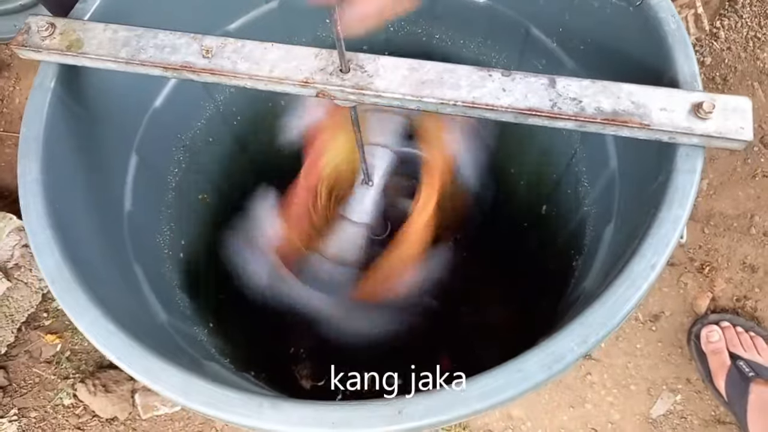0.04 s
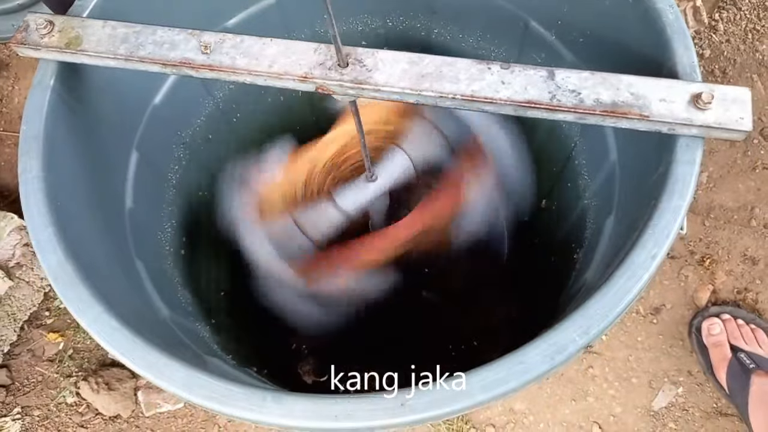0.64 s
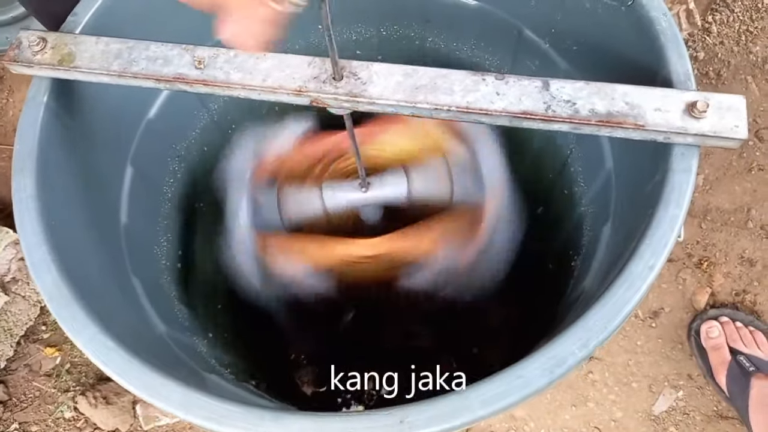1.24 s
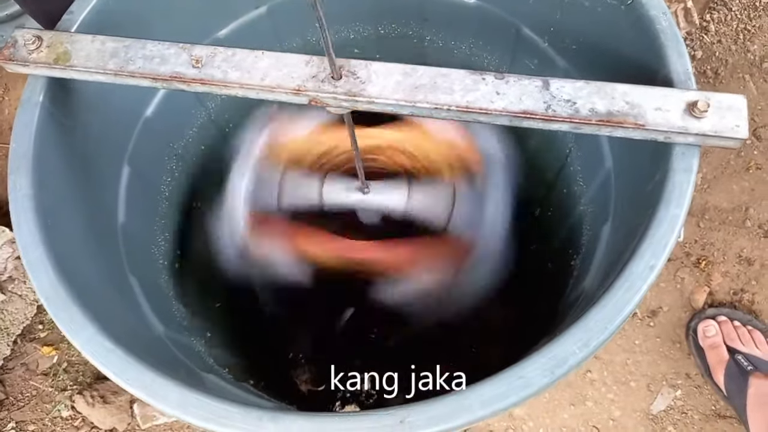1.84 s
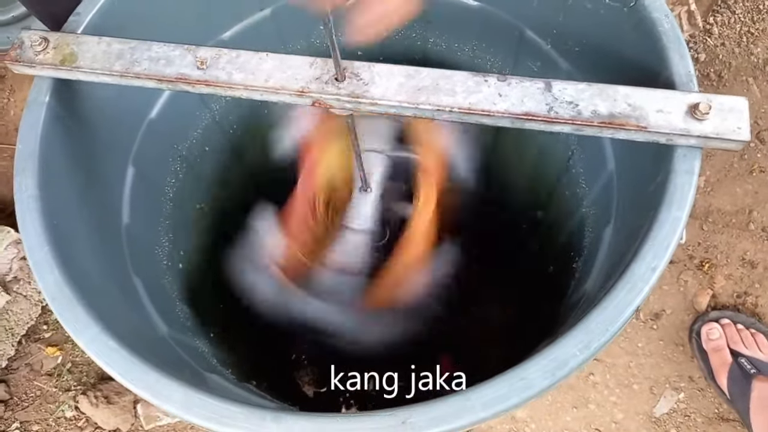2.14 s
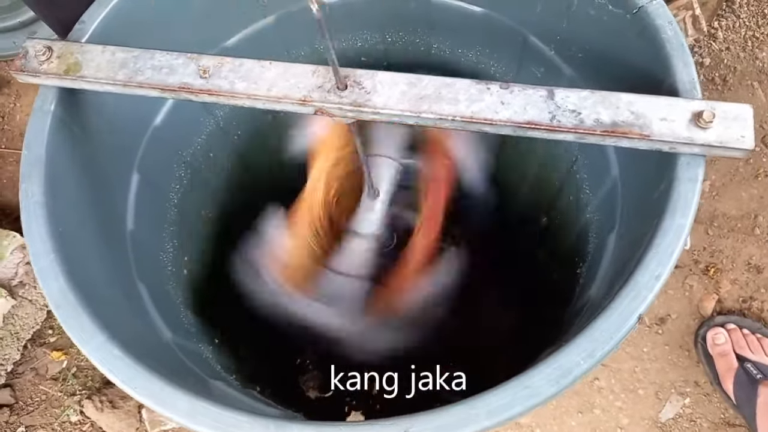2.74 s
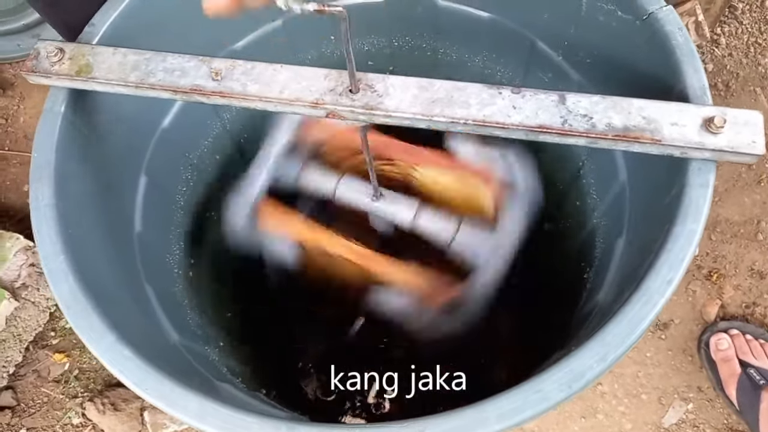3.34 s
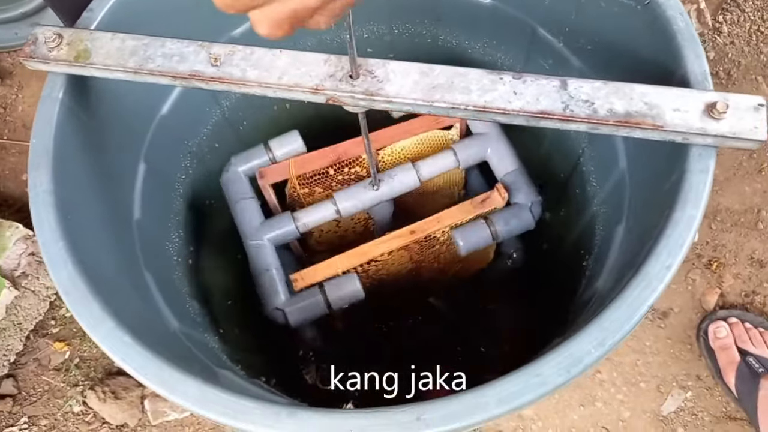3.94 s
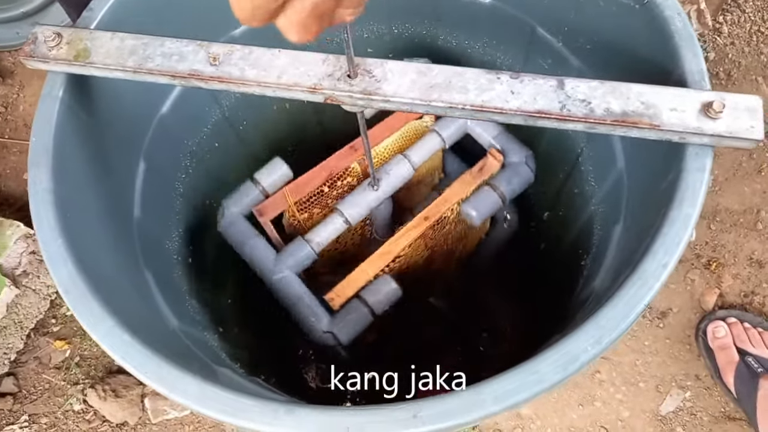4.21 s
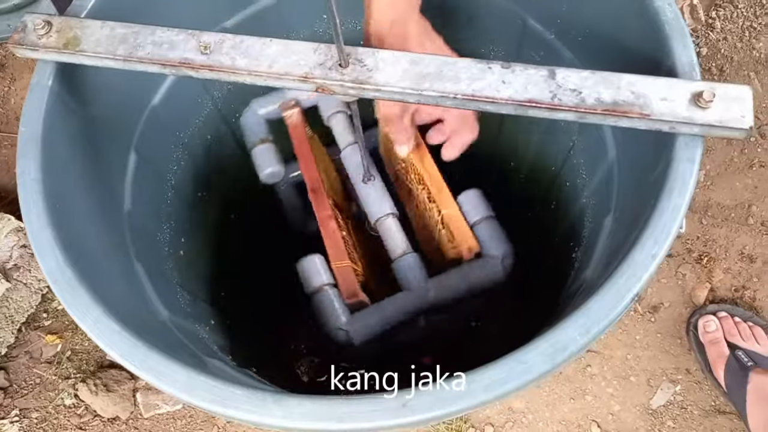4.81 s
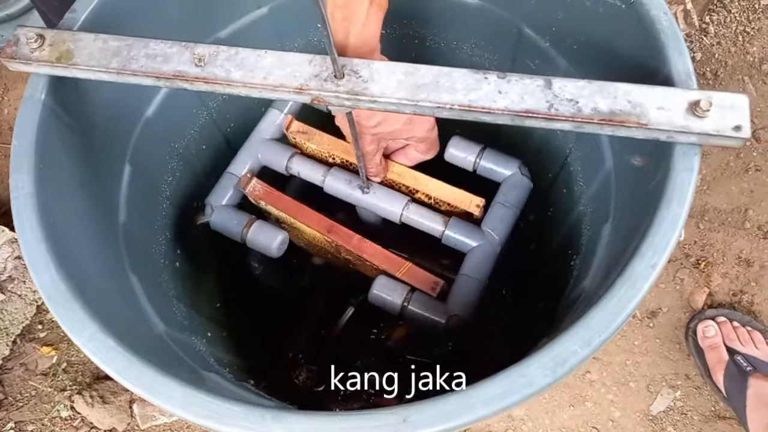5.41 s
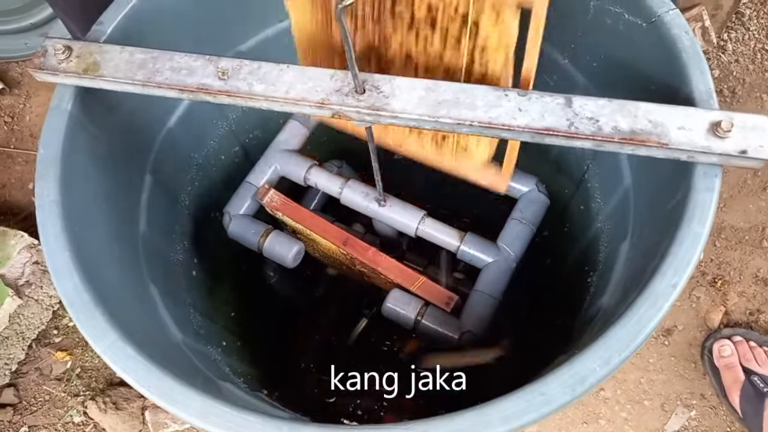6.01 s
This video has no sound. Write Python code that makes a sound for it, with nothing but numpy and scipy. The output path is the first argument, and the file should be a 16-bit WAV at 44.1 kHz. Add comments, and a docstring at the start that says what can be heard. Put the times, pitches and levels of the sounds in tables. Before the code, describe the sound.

A hand-spun honey extractor is heard outdoors, from just above the rim of its plastic bucket. From the start until about 3 seconds, a steel rod grinds roughly in its bearings and clanks irregularly against a metal crossbar. Wooden frames clack and knock in their holders, the unbalanced cage makes the bucket boom, and honey drops patter faintly on the wall. Stronger clanks come around 1.5 and 1.9 seconds, a tiny high squeal at 2.3, and the hardest, ringing clank at 2.9. The cage then coasts, its grinding fading away by about 4.5 seconds amid lighter knocks, ticks and rubs, while a soft outdoor hiss comes up. After a sharp tick, a hand stops the cage at 4.8 seconds with a hollow thump and a small crack. From 5 to nearly 6 seconds, a wooden frame slides out in short, quiet, grainy scrapes.

```python
"""Outdoors, a hand-spun honey extractor: a pipe cage with two comb frames turns on a steel rod in a
plastic bucket. The rod grinds in its bearings and clanks in the metal crossbar, the unbalanced cage
makes the bucket boom, the frames rattle and honey patters on the wall.
The cage coasts down; a hand stops it with a thump and slides a wooden frame out."""
import sys
import numpy as np
from scipy import signal
from scipy.fft import rfft, irfft, next_fast_len
from scipy.io import wavfile
from scipy.ndimage import uniform_filter1d, map_coordinates

SR = 44100
rng = np.random.default_rng(int(sys.argv[2]) if len(sys.argv) > 2 else 0)


def wav_record(signal):
    """Record a signal, one row per channel, as 16-bit PCM in the file named by sys.argv[1]."""
    frames = np.transpose(np.atleast_2d(signal))
    bounded = np.clip(frames, -1, 1)
    # unit amplitude maps onto the largest positive 16-bit level
    quanta = np.round(bounded * 32767).astype(np.int16)
    wavfile.write(sys.argv[1], SR, quanta)


N = 271640
SCENE_T = np.arange(N) / SR
RING_T = np.arange(int(.45 * SR)) / SR  # time axis of one impact
LET_GO_S = 2.9  # the cage coasts from here


def amp(db):
    """Decibels to gain."""
    return 10 ** (np.asarray(db) / 20)

def unit(x):
    """x at rms 1."""
    return x / np.sqrt(np.mean(x ** 2) + 1e-20)

def crest(x):
    """x with its loudest 5 ms at rms 1."""
    return x / np.sqrt(uniform_filter1d(np.mean(x ** 2, 0), 220).max() + 1e-20)

def along(points, hz):
    """Interpolate (f/Hz, value) points on a log axis."""
    freqs, values = np.transpose(points)
    return np.interp(np.log(hz + 1), np.log(freqs + 1), values)

def curves(rows):
    """One value per sample for each column after the time."""
    times, *columns = np.transpose(rows)
    return [np.interp(SCENE_T, times, column) for column in columns]

def wobble(rate_hz):
    """Smooth random curve."""
    knots = rng.standard_normal(int(N * rate_hz / SR) + 4)
    return map_coordinates(knots, [SCENE_T * rate_hz])

def add(track, at_s, sound):
    """Mix a sound into a stereo track."""
    start = int(np.clip(round(at_s * SR), 0, N - 1))
    track[:, start:start + sound.shape[1]] += sound[:, :N - start]

def burst(t60):
    """Scattered reflections of one contact, dying away."""
    return rng.standard_normal((2, len(RING_T))) * amp(-60 * RING_T / t60)

def onset(rise_s):
    """Exponential attack of an impact."""
    return 1 - np.exp(-RING_T / rise_s)

def slips(per_s, spread_db, smooth):
    """Irregular stick-slip jolts of uneven size over a share of smooth friction."""
    jolts = (rng.random(N) < per_s / SR) * amp(spread_db * rng.standard_normal(N))
    return unit(jolts * rng.choice([-1, 1], (2, N))) + smooth * rng.standard_normal((2, N))

def ringing(modes, db_per_octave):
    """Struck metal: decaying modes of scattered strength and phase."""
    hz, mode_db, t60 = np.transpose(modes)
    strengths = amp(mode_db + rng.normal(0, 2, len(hz)) + db_per_octave * np.log2(hz / 8000))
    phases = 2 * np.pi * rng.random(len(hz)) + rng.normal(0, 1.0, (2, len(hz)))
    waves = np.exp((2j * np.pi * hz - np.log(1000) / t60)[:, None] * RING_T)
    return ((strengths * np.exp(1j * phases)) @ waves).imag

# bucket resonances: f/Hz, width/Hz, lift/dB
BUCKET_MODES = [(139.7, 34, 16.5), (230.7, 28.6, 8.5), (296.8, 69, 7.5), (347.5, 30, 6), (431.7, 18, 8),
                (494, 97, 6), (640, 76, 11.5), (816.4, 66, 11), (1128, 85, 7)]
# left-right likeness: f/Hz, correlation
COHERENCE = [(60, .96), (130, .99), (290, .94), (640, .66), (1410, .25), (3100, .05), (7000, .05)]
def colour(pair, spectrum, bucket=0., peaks=()):
    """Two unrelated signals to stereo, through a spectrum, a share of the bucket's modes and peaks."""
    n = pair.shape[1]
    size = 2 * next_fast_len(n // 2 + 4096)
    hz = np.fft.rfftfreq(size, 1 / SR)
    def lift_db(rows):
        return sum(db / (1 + (2 * (hz - centre) / width) ** 2) for centre, width, db in rows)
    gain = amp(along(spectrum, hz) + bucket * lift_db(BUCKET_MODES) + lift_db(peaks))
    cepstrum = irfft(np.log(gain))
    cepstrum[1:size // 2] *= 2  # fold to minimum phase
    cepstrum[size // 2 + 1:] = 0
    filtered = rfft(pair, size) * np.exp(rfft(cepstrum))
    angle = np.arccos(np.clip(along(COHERENCE, hz), -1, 1)) / 2
    mid, side = irfft(filtered * [np.cos(angle), np.sin(angle)])[:, :n]
    return np.array([mid + side, mid - side])

def boom(hz, rise_s, t60):
    """The bucket's lowest mode, alike on both sides."""
    swell = 1 - np.exp(-(RING_T / rise_s) ** 2)
    mode = amp(-60 * RING_T / t60) * np.sin(2 * np.pi * hz * RING_T)
    return crest(np.tile(swell * mode, (2, 1)))


# recorder's automatic gain recovering, as a set curve on the hiss: t/s, level/dB
GAIN_RECOVERY = [(2.9, -57.5), (3.9, -53.5), (4.3, -52), (4.65, -48.5), (5.55, -48), (6.16, -50)]
# spectra of the hiss and the open bucket: f/Hz, level/dB
HISS_SPECTRUM = [(20, -30), (40, -23), (72, -3), (135, -7.5), (175, -10), (260, -10), (450, -13),
                 (800, -15), (1500, -15), (2900, -17.5), (3900, -24), (7000, -28.5), (12000, -33),
                 (16000, -35.5)]
HOLLOW_SPECTRUM = [(25, -27), (50, -19), (72, 1), (110, -3.5), (300, -53)]
def outdoors():
    """Steady outdoor hiss, louder as the recorder's gain recovers after the clatter; a low hollow."""
    recovery_db, = curves(GAIN_RECOVERY)
    hiss = unit(colour(slips(per_s=350, spread_db=8.5, smooth=3.8), HISS_SPECTRUM, bucket=.11))
    drift_db = .5 * wobble(9)
    bucket_hollow = unit(colour(rng.standard_normal((2, N)), HOLLOW_SPECTRUM))
    return amp(recovery_db + 12.5 + drift_db) * hiss + amp(-45) * bucket_hollow

# wood rubbing on pipe: t/s, length/s, centre/Hz, level/dB
STROKES = [(3.806, 0.026, 315, -32), (3.819, 0.054, 233, -32.5), (4.166, 0.1, 317, -40),
           (4.479, 0.072, 530, -37.5), (4.575, 0.066, 1900, -39.5), (4.95, 0.15, 1800, -40.5),
           (5.199, 0.045, 735, -37), (5.229, 0.043, 1610, -34), (5.4, 0.035, 2930, -37),
           (5.407, 0.076, 1510, -39.5), (5.543, 0.11, 170, -36), (5.716, 0.058, 159, -33),
           (5.577, 0.04, 865, -34), (5.74, 0.061, 1700, -40)]
def slides():
    """The frame rubs along its holders in short grainy strokes."""
    out = np.zeros((2, N))
    friction = slips(per_s=420, spread_db=3, smooth=.2)
    for at_s, length_s, hz, db in STROKES:
        stroke = friction[:, int(at_s * SR):int((at_s + length_s) * SR)]
        spectrum = [(hz / 8, -35), (hz / 2, -8), (hz, 0), (hz * 2, -14), (hz * 8, -42)]
        rub = unit(colour(stroke, spectrum, bucket=.26))
        swell = np.sin(np.pi * np.linspace(0, 1, rub.shape[1]) ** .74)
        add(out, at_s, amp(db) * rub * swell)
    return out

# light touches: t/s, level/dB, centre/Hz
TOUCHES = [(2.9906, -24.5, 11600), (3.101, -37, 9000), (3.512, -34, 9000), (3.798, -33, 8800),
           (4.4448, -41, 12000), (4.6933, -20.5, 12200), (4.9781, -35, 9000), (5.1262, -36, 14500),
           (5.4035, -34, 8000)]
# tick spectrum: f/Hz, level/dB
TICK_SPECTRUM = [(600, -18), (2000, -5), (6000, -3.5), (9500, -1.5), (11700, -3), (13500, -6), (16000, -13)]
def ticks():
    """Frames and cage touch lightly: small sharp ticks."""
    out = np.zeros((2, N))
    for at_s, db, hz in TOUCHES:
        contact = burst(.0056) + .44 * burst(.12)
        tick = colour(contact, TICK_SPECTRUM, peaks=[(hz, 1200, 9.5)])
        add(out, at_s, amp(db - 6.5) * crest(tick))
    return out

def patter(per_s):
    """Flung honey drops tap the wall, each at its own pitch; higher taps die sooner."""
    out = np.zeros((2, N))
    t = RING_T[:int(.04 * SR)]
    for when, pitch, size in rng.random((int(per_s * N / SR), 3)):
        hz = 750 * (3500 / 750) ** pitch
        t60 = 26 / hz
        phase = 2 * np.pi * rng.random() + rng.normal(0, .43, (2, 1))
        envelope = amp(-60 * t / t60) * (1 - np.exp(-t / .0016))
        tap = envelope * np.sin(2 * np.pi * hz * t + phase)
        add(out, when * N / SR, amp(19 * size - 1.5 * pitch) * tap)
    return unit(out)

# frames striking their holders: t/s, level/dB, centre/Hz
FRAME_CLACKS = [(0.088, -14, 950), (0.11, -19, 2850), (0.2105, -13.5, 890), (0.216, -19, 2700),
                (0.262, -17, 1000), (0.286, -20, 900), (0.318, -18.5, 2400), (0.435, -19.5, 820),
                (0.473, -23, 900), (0.573, -19, 860), (0.6715, -13.5, 1490), (0.698, -20, 770),
                (0.775, -23, 1100), (0.803, -14, 1400), (0.81, -18, 950), (0.835, -21, 900),
                (0.899, -17.5, 800), (1.005, -18, 840), (1.06, -15.5, 945), (1.127, -19.5, 850),
                (1.181, -22, 800), (1.2234, -16.5, 950), (1.265, -28, 850), (1.298, -19, 1100),
                (1.35, -19, 800), (1.375, -23, 2900), (1.474, -12.5, 766), (1.495, -10, 780),
                (1.546, -22, 900), (1.591, -19, 1300), (1.623, -15.5, 800), (1.712, -18.5, 836),
                (1.852, -15, 830), (1.943, -18, 2220), (1.965, -15, 900), (2.088, -22, 1700),
                (2.158, -22, 800), (2.244, -16, 905), (2.324, -16, 3150), (2.329, -13, 890),
                (2.388, -17.5, 810), (2.448, -19, 2700), (2.478, -21, 2130), (2.522, -18, 2900),
                (2.574, -14.5, 725), (2.656, -15.5, 825), (2.68, -16.5, 850), (2.7326, -16, 2000),
                (2.757, -23, 900), (2.815, -19, 1900), (2.9, -10.5, 820), (2.992, -12.5, 1200),
                (3.0, -22, 800), (3.512, -23, 900), (3.5131, -23, 2330), (3.7961, -21, 2260),
                (5.21, -28, 700), (5.405, -28, 3200)]
# wood on plastic: f/Hz, level/dB
CLACK_SPECTRUM = [(300, -7.5), (750, -0.5), (1500, -3.5), (2900, -3), (4200, -14.5), (8000, -19),
                  (16000, -27)]
def rattles(strays_per_s=4):
    """Wood taps plastic as the cage sways: dry clacks ring the bucket, with light strays between."""
    out = np.zeros((2, N))
    strays = []
    for when, force in rng.random((int(strays_per_s * LET_GO_S), 2)):
        hz = 1300 * np.exp(.5 * rng.standard_normal())
        strays.append((LET_GO_S * when, -27 + 5 * force, hz))
    for at_s, db, hz in FRAME_CLACKS + strays:
        contact = burst(.075) + 1.8 * burst(.014)
        clack = colour(contact, CLACK_SPECTRUM, bucket=.99, peaks=[(hz, .42 * hz, 11)])
        add(out, at_s, amp(db - 4.5) * crest(clack))
    return out

# frames against cage: t/s, body/dB, thud/dB, click/dB
FRAME_KNOCKS = [(0.222, -23, -29, -26), (0.323, -11.5, -31, -36), (0.368, -11.5, -28, -48),
                (0.552, -13, -26, -25), (0.771, -14.5, -17, -35), (1.078, -27, -34, -36),
                (1.192, -13, -33, -42), (1.301, -15.5, -31, -48), (1.409, -14, -40, -35),
                (1.541, -15, -39, -48), (1.618, -23, -34, -38), (1.858, -14.5, -19, -21),
                (1.971, -11.5, -22, -31), (2.127, -15, -34, -34), (2.186, -21, -21, -46),
                (2.283, -20, -25, -46), (2.485, -10.5, -32, -44), (2.574, -15, -17, -46),
                (2.845, -13, -25, -44), (2.901, -16, -22.5, -24), (2.993, -24, -40, -38),
                (3.095, -24.5, -47, -51), (3.149, -23, -55, -57), (3.268, -22, -40, -58),
                (3.307, -23, -31, -48), (3.512, -26.5, -42, -49), (3.592, -30.5, -45, -63),
                (3.8, -26, -41, -38), (3.998, -30, -41, -39), (4.705, -25, -29, -49)]
# hollow wooden body: f/Hz, level/dB
WOOD_SPECTRUM = [(90, -27), (200, -3), (330, 3), (520, -2), (900, -18), (2000, -17), (6000, -40.5)]
def knocks():
    """A frame knocks the cage: a hollow body, the bucket's thud and a dry click."""
    out = np.zeros((2, N))
    for at_s, body_db, thud_db, click_db in FRAME_KNOCKS:
        body = colour(burst(.12) * onset(.001), WOOD_SPECTRUM, bucket=.7)
        add(out, at_s, amp(body_db - 3) * crest(body))
        add(out, at_s, amp(thud_db) * boom(hz=133.3, rise_s=.012, t60=.3))
        add(out, at_s, amp(click_db) * crest(colour(burst(.2), CLACK_SPECTRUM)))
    return out

# cage and bucket under the hand: f/Hz, level/dB, t60/s
THUMP_MODES = [(136, 0.5, 0.29), (239, -10.5, 0.13), (332, -8, 0.13), (418, -4.5, 0.072),
               (502, -11.5, 0.12), (644, -12, 0.088)]
# hand on cage: t/s, thump/dB, crack/dB
HAND_STOP = (4.8405, -12, -23.5)
def hand_stop(palm_rise_s=.0055):
    """A soft palm stops the cage: the bucket thumps and the frames crack against their holders."""
    out = np.zeros((2, N))
    at_s, thump_db, crack_db = HAND_STOP
    modes = sum(amp(db - 60 * RING_T / t60) * np.sin(2 * np.pi * (hz * RING_T + rng.random()))
                for hz, db, t60 in THUMP_MODES)
    thump = modes * (1 - np.exp(-(RING_T / palm_rise_s) ** 2))
    add(out, at_s, amp(thump_db) * crest(np.tile(thump, (2, 1))))
    contact = burst(.19) + .93 * burst(.015)
    crack = colour(contact, CLACK_SPECTRUM, bucket=.54, peaks=[(2840, 900, 5)])
    add(out, at_s, amp(crack_db) * crest(crack))
    return out

# dry rod's squeal: t/s, f/Hz, level/dB
SQUEAL_GLIDE = [(2.322, 8000, -68), (2.328, 7730, -25), (2.345, 7360, -30), (2.36, 7200, -38),
                (2.405, 7140, -43), (2.44, 7130, -66)]
def squeal():
    """A rough stick-slip whistle sinks onto a mode of the rod."""
    hz, db = curves(SQUEAL_GLIDE)
    phase = 2 * np.pi * np.cumsum(hz * (1 + .038 * wobble(1100))) / SR
    sounding = (SCENE_T > SQUEAL_GLIDE[0][0]) & (SCENE_T < SQUEAL_GLIDE[-1][0])
    return sounding * amp(db + 4.1 * wobble(200)) * np.sin(phase + rng.normal(0, .73, (2, 1)))

# crossbar modes: f/Hz, level/dB, t60/s
BAR_MODES = [(2046, -11, .08), (2353, 0, .125), (2450, -11, .09), (2870, -16, .07), (3838, -17, .11),
             (4355, -23, .14)]
# rod dragging on crossbar: t/s, length/s, level/dB
ROD_DRAGS = [(0.22, 0.054, -33), (1.613, 0.1, -30), (1.85, .05, -36), (1.9, .09, -34), (2.66, 0.04, -35)]
def drags():
    """The dragging rod bows the crossbar: friction swells and fades in its modes."""
    out = np.zeros((2, N))
    for at_s, length_s, db in ROD_DRAGS:
        n = int(length_s * SR)
        friction = rng.standard_normal((1, n)) * np.hanning(n)
        bowed = signal.fftconvolve(friction, ringing(BAR_MODES, db_per_octave=4), axes=1)
        add(out, at_s - .015, amp(db) * crest(bowed))
    return out

# steel rod modes: f/Hz, level/dB, t60/s
ROD_MODES = [(5308, -15, .12), (5900, -10, .1), (6700, -9, .08), (6788, -9, .13), (7138, -11, .15),
             (7450, -8, .07), (7770, -9, .1), (9120, -10, .08), (10110, -8, .08), (10520, -7, .08),
             (11070, -11, .075), (11332, -7, .08), (12165, 1, .07), (13000, -11, .06)]
# bands that rod and bar radiate well or poorly: f/Hz, width/Hz, lift/dB
METAL_BANDS = [(1450, 400, -5), (2900, 250, 1), (5550, 300, -3), (6280, 250, -3), (6760, 300, 3.5),
               (8220, 330, -11), (10400, 400, 3), (10850, 200, -4), (12160, 200, 4), (13100, 500, 3),
               (14000, 400, -5), (15100, 1000, 5)]
# metal on metal: f/Hz, level/dB
CRACK_SPECTRUM = [(600, -23), (2000, -0.5), (3200, -1), (5200, -1.5), (7000, 0.5), (8300, 4), (10000, 2.5),
                  (12500, 3), (16000, -8)]
# rod striking crossbar: t/s, level/dB, bar ring/dB
ROD_BLOWS = [(0.079, -23, -38), (0.101, -18, -22), (0.1595, -24, -42), (0.208, -17.5, -22),
             (0.3006, -18, -35), (0.3294, -17, -26), (0.4579, -24.5, -36), (0.5684, -18, -36),
             (0.6714, -27, -34), (0.7865, -33, -31), (0.941, -20, -39), (1.0053, -18, -41),
             (1.0245, -19.5, -28), (1.151, -19, -30), (1.179, -23, -36), (1.2401, -24.5, -38),
             (1.4708, -8, -15.5), (1.4924, -12, -17), (1.617, -17.5, -20.5), (1.7, -22, -34),
             (1.7303, -13.5, -23), (1.8474, -13, -28), (1.854, -10.5, -19), (1.9597, -14, -18.5),
             (2.093, -25, -26), (2.2366, -27, -33), (2.324, -12.5, -36), (2.4274, -20.5, -33),
             (2.5702, -13, -35), (2.654, -13, -19), (2.677, -12, -20), (2.8852, -19, -35),
             (2.8882, -4, -32), (2.8973, -11, -22), (2.905, -20, -6.5)]
def clanks(rebounds_per_s=700):
    """The rod hits the crossbar and rebounds; harder blows chatter longer, brighter, and ring more."""
    out = np.zeros((2, N))
    n = len(RING_T)
    for at_s, db, bar_db in ROD_BLOWS:
        force_db = db + 9
        chatter_s = .0081 * amp(.16 * force_db)
        db_per_octave = .5 * force_db
        spectrum = [(hz, level + db_per_octave * np.log2(hz / 8000)) for hz, level in CRACK_SPECTRUM]
        rebounds = (rng.random(n) < rebounds_per_s / SR) * rng.normal(0, .7, n)
        rebounds *= np.exp(-RING_T / chatter_s)
        rebounds[0] = 1  # the blow itself
        direct = 10 * burst(.0007)
        reflections = burst(.12) + .62 * burst(.014)
        contact = colour(direct + reflections, spectrum, peaks=METAL_BANDS)
        crack = crest(signal.fftconvolve(contact, rebounds[None], axes=1)[:, :n])
        rod = amp(-9 + .4 * force_db) * crest(ringing(ROD_MODES, db_per_octave) * onset(.0015))
        add(out, at_s, amp(db - 5.5 + .044 * force_db) * (crack + rod))
        bar = crest(ringing(BAR_MODES, db_per_octave=0) * onset(.003))
        add(out, at_s, amp(bar_db - 8) * bar)
    return out

# scraping grains: f/Hz, level/dB
GRIT_SPECTRUM = [(300, -12), (900, -3), (1500, -3), (2700, 0), (4000, -10), (7000, -22), (16000, -32)]
def grit(per_s=55, t60=.06):
    """Grains catch in the bearings: sharp, uneven scrapes that keep the crossbar ringing faintly."""
    catches = (rng.random(N) < per_s / SR) * amp(14 * rng.random(N))
    envelope = signal.fftconvolve(catches, amp(-60 * RING_T / t60))[:N]
    scrapes = envelope * rng.standard_normal((2, N))
    bar_peaks = [(hz, 5 / bar_t60, 13 * amp(db)) for hz, db, bar_t60 in BAR_MODES]
    return unit(colour(scrapes, GRIT_SPECTRUM, bucket=.82, peaks=METAL_BANDS + bar_peaks))

# grinding, driven then coasting: t/s, level/dB
GRIND_LEVEL = [(0.0, -20.5), (0.17, -23), (0.3, -19), (0.64, -22), (0.81, -20), (1.05, -21), (1.5, -21.5),
               (1.7, -21.5), (1.95, -21.5), (2.85, -21), (2.97, -31), (3.45, -36.5), (3.95, -45),
               (4.55, -61)]
# brief dips in the grinding: t/s, gain/dB
GRIND_DIPS = [(0.14, 0), (0.19, 0.5), (0.41, -1.5), (0.5, 0), (0.655, -2.5), (0.879, -1.5), (0.965, -0.5),
              (1.11, -4), (1.395, -1.5), (1.565, -6), (1.785, -3), (1.92, 0.5), (2.03, -0.5), (2.51, -6.5),
              (2.625, -1.5), (2.715, -5), (3.56, -22)]
# spectra of coarse and fine slips: f/Hz, level/dB
RUMBLE_SPECTRUM = [(20, -23), (32, -12), (52, 1.5), (100, 2), (185, -4), (300, -1), (450, -4.5), (700, -14),
                   (1000, -14.5), (1500, -28.5), (3000, -28), (8000, -83)]
RASP_SPECTRUM = [(400, -16.5), (900, 1), (1500, -1), (2700, -1), (3900, -7.5), (5500, -12.5), (9000, -15.5),
                 (16000, -18.5)]
def bearings(turns_per_s=4.255, first_sway_s=.095, dip_half_s=.016):
    """Coarse slips shake the bucket, fine ones rasp at the crossbar; honey and grit share their fade."""
    grind_db, = curves(GRIND_LEVEL)
    dip_db = sum(db * np.exp(-((SCENE_T - at_s) / dip_half_s) ** 2) for at_s, db in GRIND_DIPS)
    # the cage presses unevenly on the rod and, while driven, leans on it twice a turn
    load_db = 1.6 * wobble(30)
    sway_phase = 2 * np.pi * 2 * turns_per_s * (SCENE_T - first_sway_s)
    sway_db = .6 * np.cos(sway_phase) * (SCENE_T < LET_GO_S)
    rumble = unit(colour(slips(per_s=360, spread_db=1.5, smooth=.61), RUMBLE_SPECTRUM, bucket=1))
    rasp = unit(colour(slips(per_s=400, spread_db=-1, smooth=1), RASP_SPECTRUM, bucket=.51))
    fine = amp(4.5 + .95 * wobble(60)) * rasp + patter(per_s=320)
    grinding = amp(2 + load_db) * rumble + amp(-15.5 + sway_db) * fine + amp(-15.5) * grit()
    return amp(grind_db + dip_db) * grinding

# cage against bucket: t/s, level/dB, f/Hz, t60/s
CAGE_LURCHES = [(0.002, -15, 147, 0.053), (0.214, -8, 139, 0.12), (0.397, -14, 139.6, 0.52),
                (0.552, -11, 140, 0.19), (0.61, -8, 141.3, 0.21), (0.7, -12.5, 143.3, 0.24),
                (0.825, -19, 148, .15), (0.904, -7, 139.6, 0.16), (0.979, -13, 135, 0.13),
                (1.084, -14, 141, .16), (1.159, -13, 136.4, 0.28), (1.231, -10.5, 141, 0.11),
                (1.487, -12, 143.6, 0.55), (1.611, -20, 131, 0.19), (1.723, -4.5, 143.8, 0.48),
                (1.855, -7, 134, 0.32), (1.972, -9, 139, 0.13), (2.116, -8.5, 135, 0.33),
                (2.258, -10, 141, 0.2), (2.353, -13, 144.4, 0.21), (2.496, -11, 135.3, 0.17),
                (2.603, -14.5, 137.5, 0.49), (2.692, -10.5, 138, .22), (2.72, -12.5, 138, 0.16),
                (3.023, -18, 141.5, 0.19)]
def lurches():
    """Each lurch of the unbalanced cage makes the bucket boom."""
    out = np.zeros((2, N))
    for at_s, db, hz, t60 in CAGE_LURCHES:
        add(out, at_s - .006, amp(db - 3.5) * boom(hz, rise_s=.0098, t60=t60))
    return out

def scene():
    """The extractor from just above its rim, in the open air."""
    spinning = bearings() + lurches() + clanks() + drags() + squeal() + rattles() + knocks() + ticks()
    return spinning + hand_stop() + slides() + outdoors()

# microphone balance: f/Hz, left minus right/dB
BALANCE = [(160, 1.5), (270, 0), (450, -2), (740, .5), (1220, 3), (2300, -.4), (9000, .8)]
LEFT_LEAD_S, CEILING, TOP_HZ = .00016, .92, 15950
def record(dry):
    """Two spaced, slightly unequal microphones, softly rounded peaks and a band limit."""
    size = next_fast_len(N + 8192)
    hz = np.fft.rfftfreq(size, 1 / SR)
    left = amp(along(BALANCE, hz) / 2) * np.exp(1j * np.pi * hz * LEFT_LEAD_S)
    heard = irfft(rfft(dry, size) * [left, 1 / left], size)
    rounded = heard / (1 + (heard / CEILING) ** 8) ** (1 / 8)
    return irfft(rfft(rounded) * (hz < TOP_HZ), size)[:, :N]


dry = scene()
out = record(dry)
wav_record(out)
```